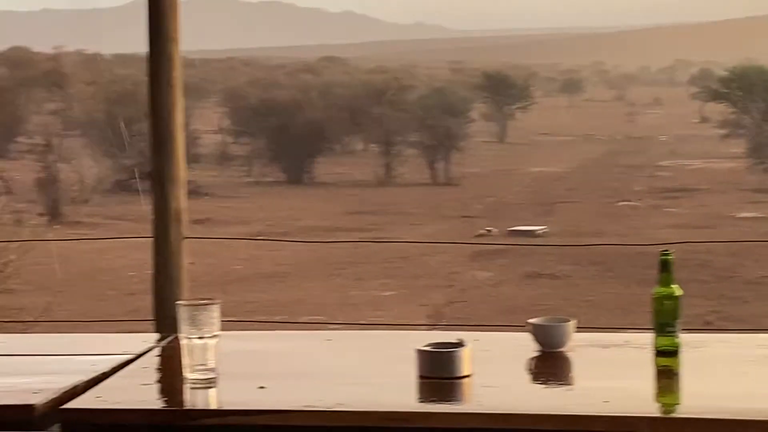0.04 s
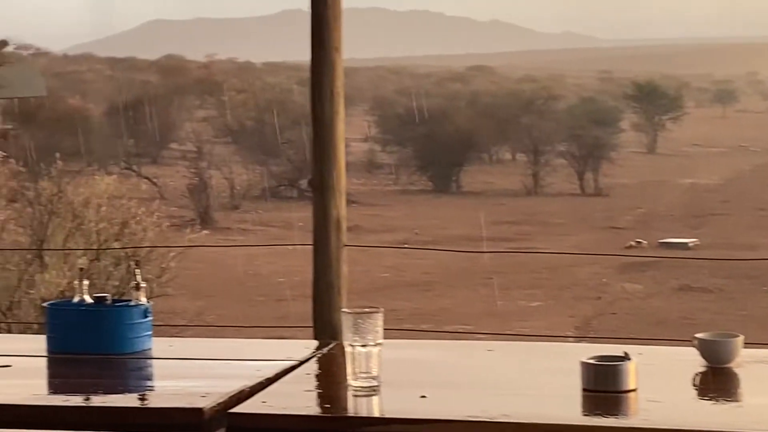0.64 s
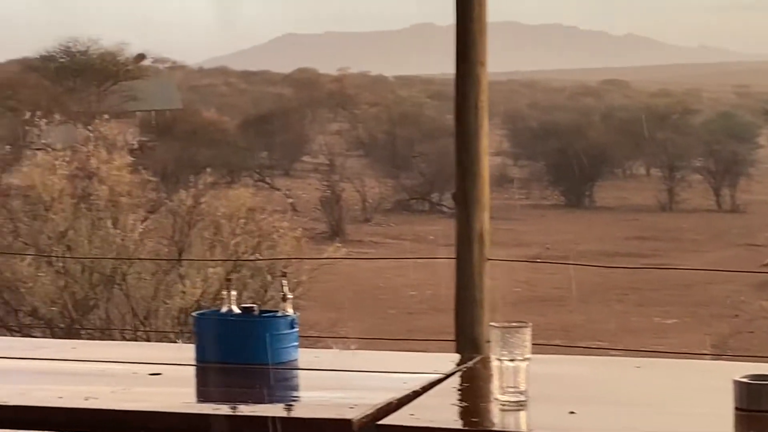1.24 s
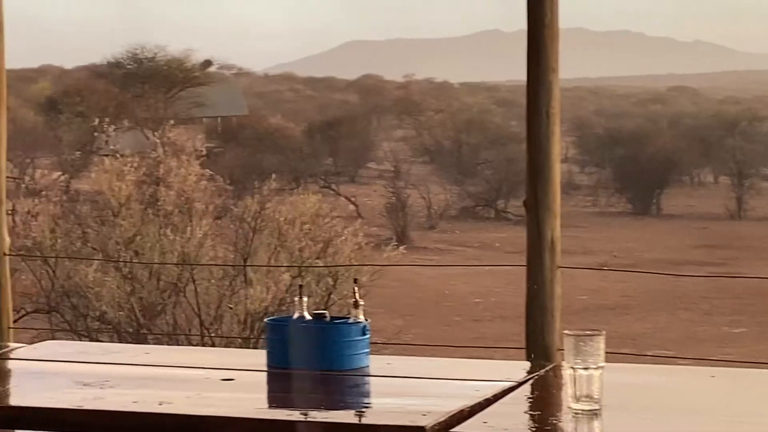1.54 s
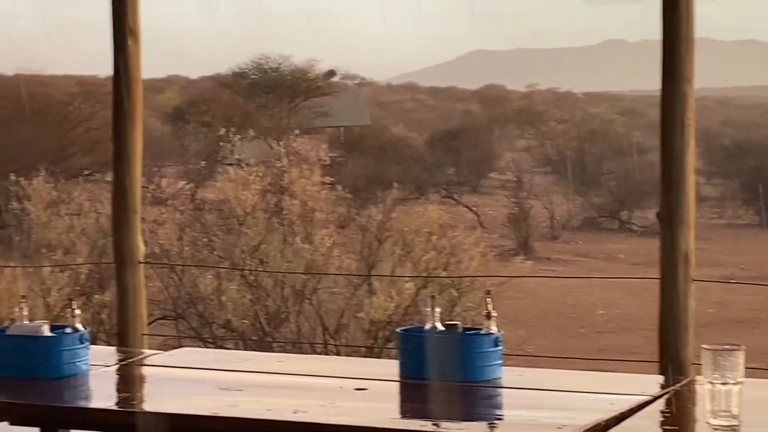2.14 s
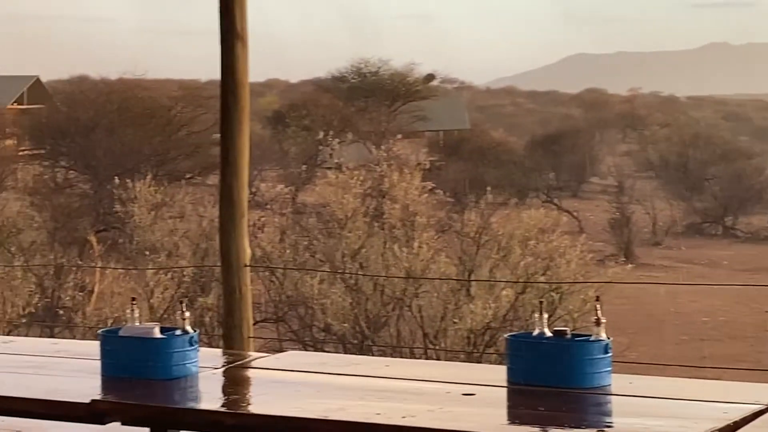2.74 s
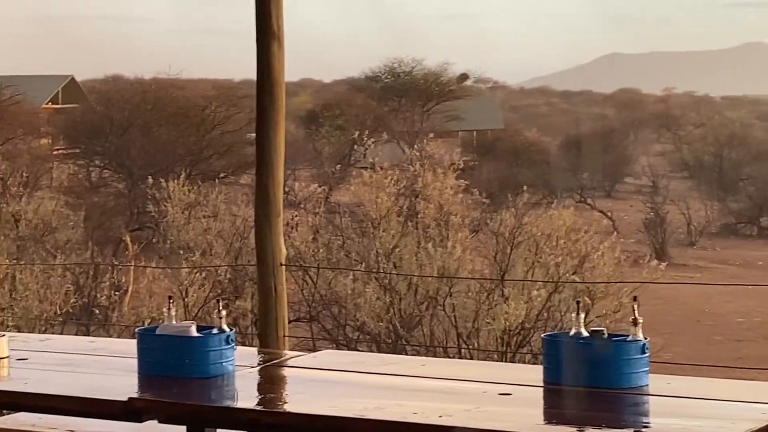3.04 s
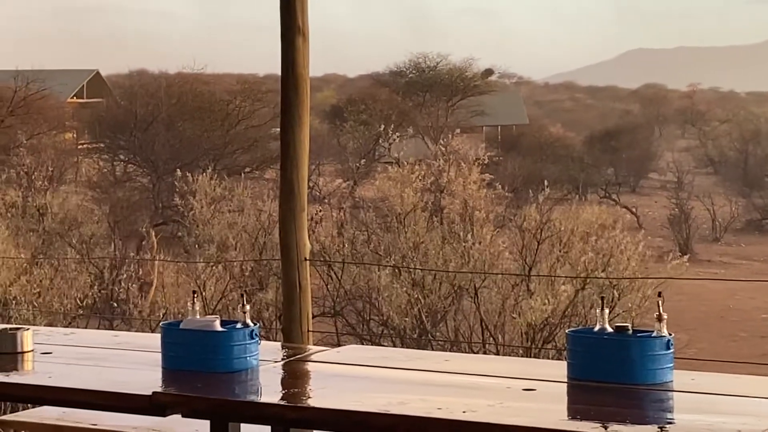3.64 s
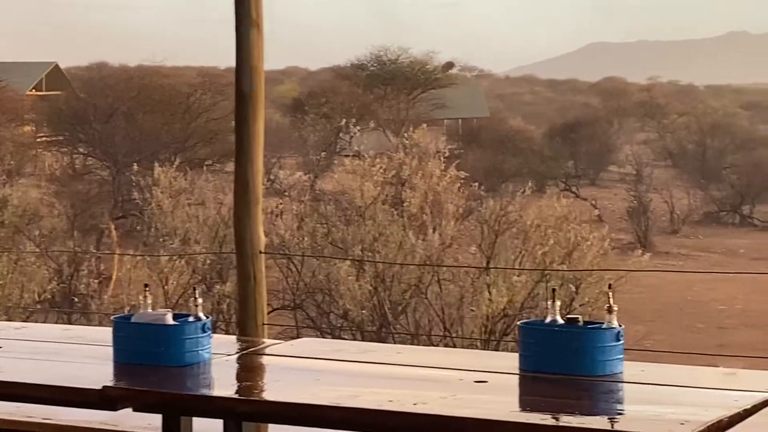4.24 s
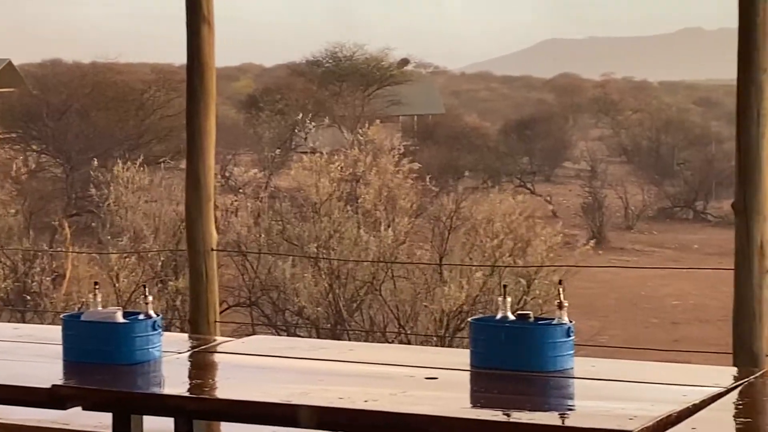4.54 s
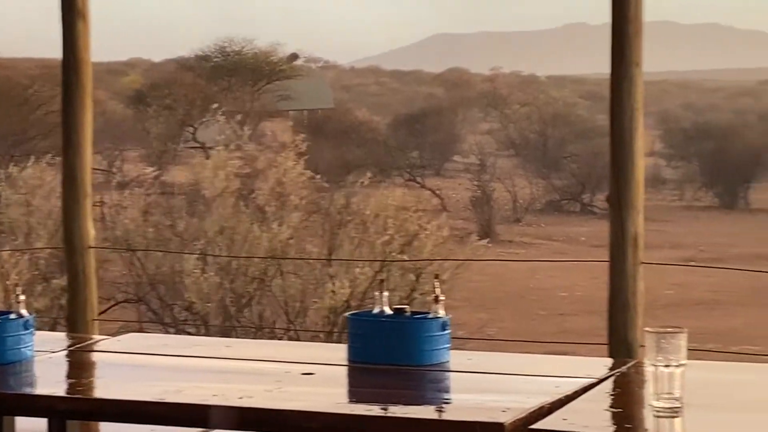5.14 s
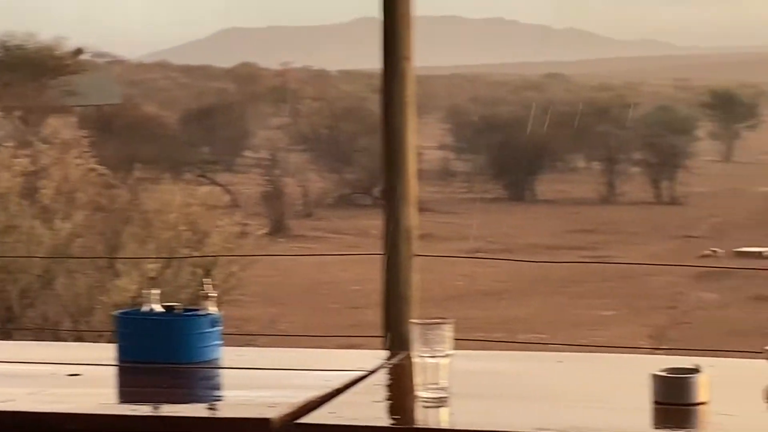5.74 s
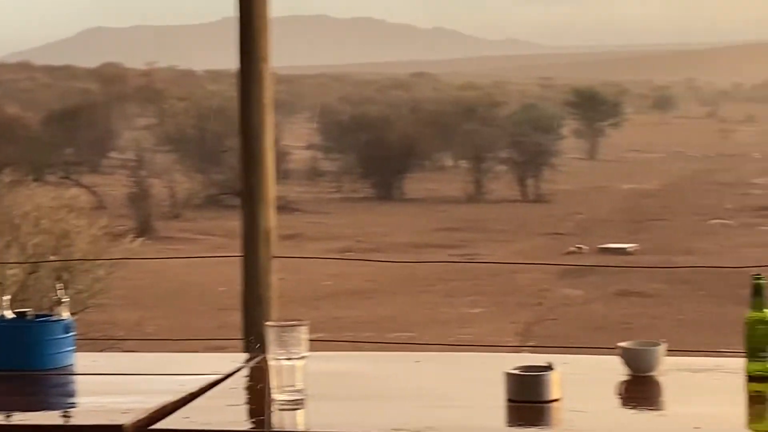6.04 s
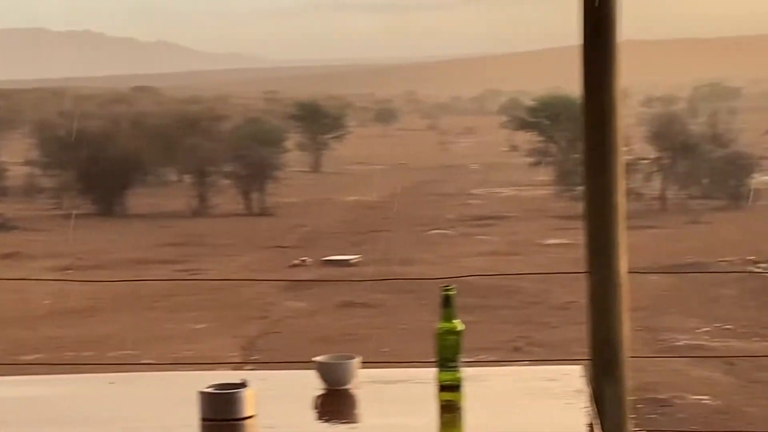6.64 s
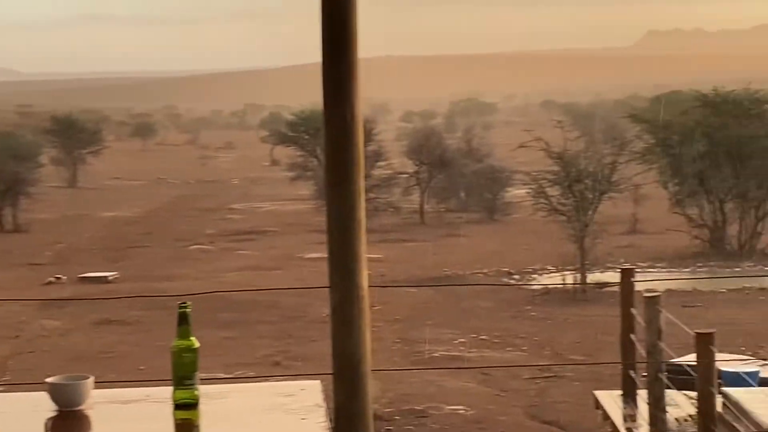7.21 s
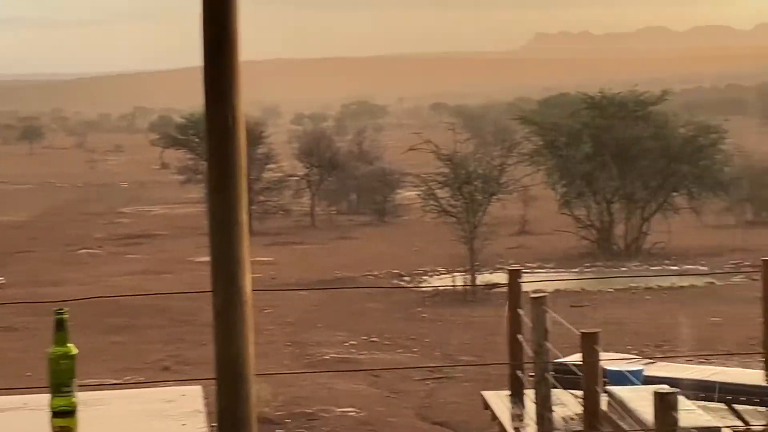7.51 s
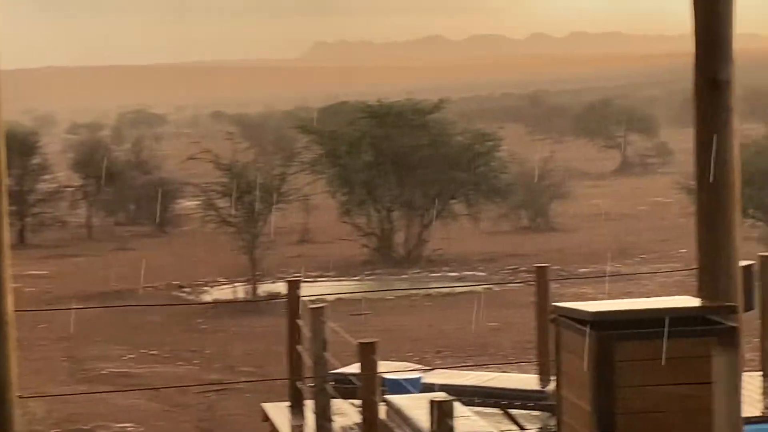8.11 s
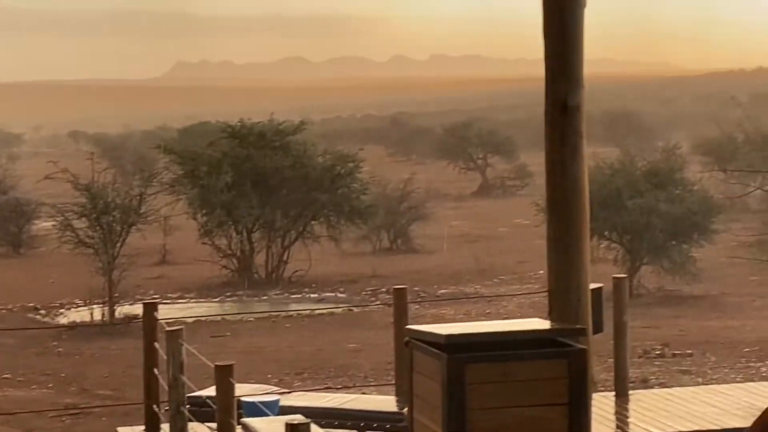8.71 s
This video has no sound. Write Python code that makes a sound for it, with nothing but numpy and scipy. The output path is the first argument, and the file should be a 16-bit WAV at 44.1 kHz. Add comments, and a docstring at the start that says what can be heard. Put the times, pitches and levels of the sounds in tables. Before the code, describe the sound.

Steady rain over open country and a roofed deck, with sharp drips smacking on wet tables and boards.

```python
"""A roofed wooden deck in open bush country, in steady rain.
Countless far drops add incoherently into a wash, while drops overhead drive the modes of the roof sheets.
Nearer impacts are heard singly: small drops patter, drips smack on wet tables and boards, and trickles
spatter, all scattered briefly by the deck. Late on, gusts rumble at the microphones,
and two soft bumps sound near the end."""
import sys
import numpy as np
from scipy import signal
from scipy.fft import rfft, irfft, next_fast_len
from scipy.io import wavfile
from scipy.ndimage import uniform_filter1d

SR = 44100
rng = np.random.default_rng(int(sys.argv[2]) if len(sys.argv) > 2 else 0)


def to_wav(s):
    """Save 16-bit WAV."""
    ch = np.atleast_2d(s).T  # columns
    pcm = np.round(np.clip(ch, -1, 1) * 32767)  # PCM
    wavfile.write(sys.argv[1], SR, pcm.astype(np.int16))


N = 386757

# strength of the nearer rain, taken about its mean: (time [s], level [dB])
RAIN_STRENGTH = [(0, -32.5), (1.25, -31), (2.0, -33), (2.5, -32), (2.9, -33.0), (3.75, -33), (4.05, -33),
                 (4.45, -33), (4.8, -33), (5.2, -35.0), (6.05, -35), (6.95, -34), (7.5, -32), (8.1, -33.5),
                 (8.77, -32.6)]
# roar of far rain on open ground, taken about its mean: (time [s], level [dB])
FAR_ROAR = [(0, -35.5), (0.8, -34.5), (1.3, -34.5), (1.85, -35), (2.5, -34), (2.75, -36), (3.1, -34.6),
            (3.45, -35.5), (4.05, -34.5), (4.35, -35.5), (4.8, -35), (5.2, -37), (6.1, -36.7), (6.55, -36),
            (6.95, -36), (7.5, -34), (7.95, -35.5), (8.4, -35.5), (8.77, -35)]
# spectrum of the wash: (frequency [Hz], relative spectral density [dB])
WASH_SPECTRUM = [(30, -14), (55, -3), (85, -6.5), (130, -6), (230, -3.5), (450, -1.5), (800, -1.5),
                 (1400, -4.5), (2400, -7.5), (4000, -14.5), (6000, -20.5), (8500, -25.5), (12000, -27.5),
                 (15500, -32.5)]
# stereo image of the wash: (frequency [Hz], left-right correlation [0-1], left minus right [dB])
WASH_IMAGE = [(60, 0.98, 0.5), (130, 0.92, -2), (250, 0.92, -1.5), (503, 0.66, -1.3), (800, 0.67, 0),
              (1320, 0.53, -2), (1650, 0.28, -1.5), (2460, 0.74, -1.3), (3320, 1, 0.6), (6460, 1, 0.5)]
# modes of the roof sheets: (frequency [Hz], bandwidth [Hz], relative level [dB])
ROOF_MODES = [(208.3, 17, -3), (300, 27, -1), (393, 35, -2.5), (592, 40, 0.5), (763, 56, -1.5)]
# heavy drops that set a sheet humming: (time [s], level [dB], frequency [Hz])
HEAVY_DROPS = [(0.11, -34.5, 382), (0.36, -36.5, 205), (0.52, -36, 428), (0.77, -36, 305),
               (1.61, -35.5, 214.4), (3.29, -35, 450), (8.27, -34.5, 296)]
# the loudest drips: (time [s], relative level over 1 ms [dB], pitch [Hz],
# slap re smack [dB], wet ring re smack [dB], crispness [0-1])
LOUD_DRIPS = [(0.2113, -38, 11000, -4, -5, 0.2), (0.3436, -24.5, 10400, 0, -9, 1),
              (0.4282, -41, 4800, -4, -7, 0), (0.551, -30.5, 7800, 8, -7, 0.9),
              (0.5835, -33, 11500, 9, -9, 1), (0.6232, -36, 12200, 0, -9, 0.7),
              (0.8536, -36, 8500, 6, -9, 0.6), (1.0479, -26.5, 4400, 7, -8, 0.6),
              (1.0971, -33, 3900, -4, -3, 0), (1.1157, -21, 12400, 8, -12, 1),
              (1.1749, -29, 8000, 12, -7, 0.6), (1.1868, -27, 6600, 0, -5, 0),
              (1.5751, -26, 7800, -3, -5, 0.5), (1.6856, -30.5, 4600, 6, -4, 1),
              (1.8987, -40, 12000, 2, -9, 0.61), (1.9121, -41, 11000, 0, -7, 0.5),
              (1.9557, -41, 11000, 0, -7, 0.5), (2.0424, -27.5, 8800, 7, -9, 0.6),
              (2.102, -27, 8200, 11, -12, 0.7), (2.1332, -31.5, 3900, 2, -5, 0.6),
              (2.2488, -31, 8360, 2, -9, 0.8), (2.2705, -37, 6700, -5, -7, 0.46),
              (2.2918, -32.5, 4600, -4, -5, 0), (2.3653, -35, 7600, 4, -7, 0.4),
              (2.3785, -39, 9500, 3, -7, 0.5), (2.3918, -37, 11500, -4, -7, 0.94),
              (2.5207, -39, 11000, 0, -7, 0.5), (2.5751, -37, 6500, -3, -5, 0),
              (2.6252, -34, 11500, -3, -7, 1), (2.6503, -36, 8800, -2, -7, 0.97),
              (2.6647, -40, 6600, -3, -5, 0), (2.7165, -43, 11000, 0, -7, 0.5),
              (2.8937, -36, 8300, -5, -7, 0.55), (2.9759, -37, 11000, 4, -7, 0.3),
              (2.9985, -34, 7000, 2, -7, 0.6), (3.0092, -31, 4300, -12, -5, 0),
              (3.014, -34, 5700, -10, -2, 0.3), (3.0175, -35, 5300, -10, -2, 0),
              (3.026, -26, 9300, 8, -5, 1), (3.0298, -30, 6500, 16, -5, 1),
              (3.0376, -36, 10500, -4, -7, 0.8), (3.3731, -37, 8500, 5, -7, 0.5),
              (3.4667, -35, 8300, 6, -7, 0.7), (3.6977, -43, 11000, 0, -7, 0.5),
              (3.7495, -42, 11000, 0, -7, 0.5), (3.9848, -35, 11100, -4, -5, 0.8),
              (4.1025, -38, 12000, -2, -9, 0.85), (4.1673, -37, 6500, -8, -4, 0),
              (4.1952, -27, 10900, -5, -5, 1), (4.2666, -16, 6700, 4, -11, 0),
              (4.2751, -29, 4300, -7, -7, 0), (4.3256, -34, 9050, -2, -7, 0.55),
              (4.4888, -37, 11900, -2, -9, 0.8), (4.4998, -33, 9600, 2, -7, 0.8),
              (4.629, -34, 7000, -5, -5, 0), (4.7055, -40, 11000, 0, -7, 0.5),
              (4.7555, -36, 10500, 6, -7, 0.6), (4.8878, -24.5, 7840, 3, -6, 0.7),
              (4.8985, -35, 11500, 3, -9, 1), (4.919, -41, 4500, 0, -7, 0),
              (4.9248, -36, 10000, 4, -7, 0.5), (5.0561, -41, 6500, -3, -5, 0),
              (5.3065, -33, 6200, -14, -3, 0), (5.4141, -35, 7800, -4, -7, 0.97),
              (5.6502, -35.5, 10000, 5, -7, 0.8), (5.6586, -37, 5200, 5, -7, 0.3),
              (5.8286, -41, 10900, -4, -7, 0.85), (5.9736, -39, 11000, -3, -7, 0.5),
              (6.3388, -40, 7600, 2, -7, 0.3), (6.4039, -46, 7600, 2, -7, 0.4),
              (6.4591, -39, 7600, 0, -7, 0.2), (6.5195, -24, 3030, -8, 8, 1),
              (6.7046, -24, 6850, -2, -3, 0.2), (6.7727, -33, 5000, 0, -5, 0.0078),
              (6.8971, -18.5, 4040, 5, -10, 0), (6.8974, -28, 10300, -6, -5, 0),
              (6.9157, -39, 11300, -3, -7, 0.5), (6.9978, -37, 11500, -3, -7, 0.88),
              (7.0237, -32, 5200, 0, 2, 0.9), (7.0801, -34.5, 5000, -3, -3, 0),
              (7.1677, -25.5, 6500, 3, -7, 0.2), (7.1725, -41, 11300, -3, -7, 0.5),
              (7.2016, -25, 3600, 10, 2, 0.4), (7.2608, -33.5, 11500, -5, -7, 0.9),
              (7.2687, -31, 4200, 0, -3, 0), (7.4427, -35, 11000, 2, -9, 1),
              (7.4567, -20.5, 6440, -1, -3, 0), (7.6157, -34, 7900, -5, -5, 0.3),
              (7.6529, -33, 5000, 5, -5, 1), (7.7752, -30, 7000, 16, -7, 1),
              (7.8058, -20.5, 4460, 0, -9, 0.7), (7.9278, -36, 7600, 9, -5, 0.3),
              (7.9662, -30.5, 9200, -3, -7, 1), (7.9827, -40, 11000, 0, -7, 0.5),
              (8.0294, -28, 6000, -4, -3, 0), (8.1259, -40, 11000, 0, -7, 0.5),
              (8.1405, -35, 5000, 8, -7, 0.3), (8.1873, -32, 3400, 1, -5, 0),
              (8.1965, -36, 8000, 4, -7, 0.5), (8.2155, -30.5, 7100, 6, -5, 0.3),
              (8.2296, -40, 11000, 0, -7, 0.5), (8.3806, -39, 10700, -4, -7, 0.93),
              (8.434, -37, 6500, -5, -5, 0), (8.5845, -32, 10000, 7, -9, 1), (8.7547, -37, 6500, -3, -5, 0)]
# flurries of drops on single sheets: (peak time [s], half length [s], level [dB], frequency [Hz])
FLURRIES = [(0.56, 0.11, -42.5, 500), (0.72, .08, -42.5, 300), (0.78, .1, -44, 877), (1.24, .08, -45, 720),
            (1.6, 0.097, -44.5, 544), (2.58, .07, -47, 540), (2.78, .07, -46, 800),
            (3.682, 0.064, -44, 540), (4.04, .1, -40, 793), (4.22, .04, -41.5, 800), (4.43, .07, -43, 560),
            (4.68, 0.085, -42, 736), (4.76, 0.092, -43.5, 315), (4.918, .05, -43, 760),
            (7.46, .1, -43.5, 470), (7.523, .14, -44, 1050), (8.282, 0.11, -47, 500),
            (8.72, 0.073, -45, 270)]
# trickles that break into droplets: (peak time [s], half length [s], relative level [dB])
TRICKLES = [(0.58, .09, -50), (1.1, .03, -49), (1.167, 0.06, -43), (2.37, .025, -50), (2.52, .025, -49),
            (3.025, .03, -43), (4.92, 0.03, -47), (7.473, 0.027, -45), (8.21, 0.043, -48), (8.75, .03, -49)]
# gusts on the microphones: (peak time [s], half length [s], level [dB], frequency [Hz])
WIND_GUSTS = [(5.51, .035, -44, 52), (5.68, .06, -43, 50), (5.93, 0.037, -44, 55), (6.643, 0.2, -53, 85),
              (7.42, 0.39, -47.5, 75), (7.76, 0.065, -40, 65), (7.91, 0.05, -37, 85),
              (8.25, 0.3, -45.5, 65), (8.548, .06, -40, 95), (8.64, 0.042, -34, 99), (8.77, .06, -46, 65)]
# soft bumps at the microphones: (time [s], level [dB], frequency [Hz], 60 dB decay time [s])
LOW_BUMPS = [(8.606, -26, 126, .1), (8.642, -19, 55, 0.14)]

CUTOFF_HZ = 16300
TIME = np.arange(N) / SR


def from_db(db):
    """Amplitude ratio of a level in decibels."""
    return 10 ** (np.asarray(db) / 20)


def unit_rms(x):
    """Normalisation to an rms of 1."""
    return x / np.sqrt(np.mean(x ** 2) + 1e-20)


def about_mean(curve):
    """Linear interpolation of a level curve, in dB about its mean."""
    level = np.interp(TIME, *np.transpose(curve))
    return level - np.mean(level)


def at_hz(spectrum, hz):
    """Interpolation of each column on a log-frequency axis."""
    freqs, *columns = np.transpose(spectrum)
    return [np.interp(np.log(hz), np.log(freqs), column) for column in columns]


def band(x, low_hz, high_hz, order=2):
    """Causal Butterworth band-pass."""
    high_hz = min(high_hz, .46 * SR)
    low_hz = min(low_hz, .9 * high_hz)
    return signal.sosfilt(signal.butter(order, [low_hz, high_hz], "band", fs=SR, output="sos"), x + 1e-18)


def resonator(x, hz, width_hz):
    """Damped oscillator: a unit impulse starts a decaying sine of height 1."""
    r, w = np.exp(-np.pi * width_hz / SR), 2 * np.pi * hz / SR
    return signal.lfilter([0, np.sin(w)], [1, -2 * r * np.cos(w), r * r], x + 1e-18)


def drift(rate_hz):
    """Low-passed noise: a slow fluctuation with an rms of 1."""
    step = 40
    pole = np.exp(-2 * np.pi * rate_hz * step / SR)
    slow = signal.lfilter([1], [1, -2 * pole, pole ** 2], rng.standard_normal(N // step + 2002))[2000:]
    return np.interp(np.arange(N) / step, np.arange(len(slow)), unit_rms(slow))


def impacts(per_s, spread_db):
    """Poisson process of impulses: many small, a few large."""
    sizes = from_db(spread_db * np.minimum(rng.exponential(1, N), 3))
    return (rng.random(N) < per_s / SR) * sizes * rng.choice([-1, 1], N)


def swell(peak_s, half_s):
    """Gaussian envelope, down to 1/e at half_s from its peak."""
    return np.exp(-((TIME - peak_s) / half_s) ** 2)


def rain_wash(roar_db, hiss_db, spray_db, drops_per_s, spread_db, grain_share, patchy_db, surge_db):
    """Incoherent addition: far drops merge into noise; nearer ones stand out as grain in the treble."""
    edges = np.r_[np.geomspace(28, 4000, 18), np.geomspace(5000, 16500, 7)]
    white, run_in = rng.standard_normal((2, 2, N)), SR // 8
    surge = surge_db * drift(2.0)
    strength = about_mean(RAIN_STRENGTH) + surge
    roar = roar_db + 1.27 * (about_mean(FAR_ROAR) + surge)
    hiss = hiss_db + 1.03 * strength
    spray = spray_db + .98 * strength
    # the bass comes from far away and hardly changes; higher bands follow the nearer rain
    zone_levels, zone_hz = (roar_db, roar, hiss, spray), (100, 750, 2100, 5500)
    out, drops = np.zeros((2, N)), impacts(drops_per_s, spread_db)
    for k, (low, high) in enumerate(zip(edges, edges[1:])):
        hz = np.sqrt(low * high)
        below = drops  # each drop sounds in two neighbouring bands
        drops = impacts(drops_per_s, spread_db) if hz > 800 else np.roll(drops, SR)
        grain = grain_share * np.interp(hz, [500, 5000], [.3, 1])
        smooth, side = white[k % 2]
        mid = np.sqrt(1 - grain) * smooth + np.sqrt(grain) * unit_rms(below + drops)
        padded = np.pad([mid, side], ((0, 0), (run_in, 0)), "wrap")
        mid, side = band(padded, low, high, order=3)[:, run_in:]
        correlation, pan_db = at_hz(WASH_IMAGE, hz)
        pair = np.sqrt(1 + correlation) * mid + np.sqrt(1 - correlation) * side * [[1], [-1]]
        weights = at_hz(np.c_[zone_hz, np.eye(4)], hz)  # crossfade between the zones
        level = sum(weight * db for weight, db in zip(weights, zone_levels))
        gain = from_db(level + at_hz(WASH_SPECTRUM, hz)[0] + patchy_db * drift(21))
        out += gain * pair * from_db([[pan_db / 2], [-pan_db / 2]])
    return out


def roof_drumming(level_db, fade_db_per_s, stereo_width):
    """Modal excitation: random drops keep the roof's low modes ringing, louder in heavier rain."""
    def sheet():
        return unit_rms(sum(from_db(db) * unit_rms(resonator(impacts(150, 3.6), hz, width_hz))
                            for hz, width_hz, db in ROOF_MODES))
    fade = fade_db_per_s * (TIME - N / SR / 2)
    level = level_db + 1.8 * about_mean(RAIN_STRENGTH) - fade
    return from_db(level) * (sheet() + stereo_width * sheet() * [[1], [-1]])


def patter(boards_db, tables_db):
    """Impact noise of small, near drops: dull ticks from the boards, bright ones from wet tables."""
    boards = sum(band(impacts(30, 3), hz / 1.3, hz * 1.3) for hz in (3600, 5000, 6500))
    tables = sum(band(impacts(45, 3), hz / 1.25, hz * 1.25) for hz in (8000, 9800, 11800))
    ticks = from_db(boards_db) * unit_rms(boards) + from_db(tables_db) * unit_rms(tables)
    return ticks * from_db(.6 * about_mean(RAIN_STRENGTH))


def deck_scatter(x, level_db, t60_s):
    """Diffuse reflection from roof, posts and furniture adds a short, bright tail."""
    t = np.arange(SR // 4) / SR
    shared, per_side = rng.standard_normal(len(t)), rng.standard_normal((2, len(t)))
    decay = from_db(-60 * t / t60_s) * (t > .002)
    tail = band(shared + .3 * per_side, 5000, 13500, order=1) * decay
    response = from_db(level_db) * unit_rms(tail) / np.sqrt(len(t))
    return x + signal.fftconvolve(x[None], response, axes=1)[:, :N]


def roof_booms(attack_s, t60_s):
    """Free vibration: after a heavy drop, one mode of a sheet swells quickly and decays."""
    onset, db, hz = np.transpose(HEAVY_DROPS)[:, :, None]
    age = np.maximum(TIME - onset, 0)
    envelope = 1000 ** (-age / t60_s) * (1 - np.exp(-age / attack_s))
    return np.sum(from_db(db) * envelope * np.sin(2 * np.pi * hz * age), axis=0)


def faint_drips(count, per_s, level_db, spread_db, low_hz, high_hz):
    """Poisson arrivals of fainter drips at random pitches, as rows like those of LOUD_DRIPS."""
    gap, size, pitch = rng.random((count, 3)).T
    times = np.cumsum(-np.log(1 - gap)) / per_s
    levels = level_db + spread_db * np.sqrt(3) * (2 * size - 1)
    pitches = low_hz * (high_hz / low_hz) ** pitch
    slap_db, ring_db, crispness = 2, -7, .35
    return [(s, db, hz, slap_db, ring_db, crispness)
            for s, db, hz in zip(times, levels, pitches) if s < TIME[-1]]


def drips(rows, gain_db, ring_q, knock_db, echo_db):
    """Impulse response of a wet surface: a smack, a broad crisp-edged slap and a ring, then one echo."""
    out, click = np.zeros(N + SR), signal.unit_impulse(512)
    crack = unit_rms(band(click, 10300, CUTOFF_HZ))
    knock = unit_rms(band(click, 3030, 3770))
    echo_delays_s = rng.uniform(.0062, .009, len(rows))  # the path via the deck depends on where it lands
    for (s, db, hz, slap_db, ring_db, crispness), delay in zip(rows, echo_delays_s):
        smack = unit_rms(band(click, hz / 1.29, hz * 1.216, order=3))
        edge = from_db(-30 + 26 * crispness) * crack
        slap = unit_rms(band(click, hz / 2.53, hz * 1.6, order=3)) + edge
        ring = unit_rms(band(click, hz * (1 - .5 / ring_q), hz * (1 + .5 / ring_q), order=1))
        drip = unit_rms(smack + from_db(slap_db) * slap + from_db(ring_db) * ring)
        if hz < 7400:  # low drips knock on the boards; the others land on the tables
            drip += from_db(knock_db) * knock
        drip *= from_db(db + gain_db) * np.sqrt(SR / 1000 / np.sum(drip ** 2))  # level over 1 ms
        for arrival, gain in ((s, 1), (s + delay, from_db(echo_db))):
            start = round(arrival * SR)
            out[start:start + len(drip)] += gain * drip
    return out[:N]


def roof_flurries(width_hz):
    """Forced vibration: a burst of drops drives one sheet, whose hollow resonance swells and fades."""
    out = np.zeros(N)
    for s, half_s, db, hz in FLURRIES:
        drumming = band(impacts(600, 1.6), hz - width_hz / 2, hz + width_hz / 2)
        out += from_db(db) * swell(s, half_s) * unit_rms(drumming)
    return out


def spatters(gain_db, low_hz, high_hz):
    """Shot noise: a trickle breaks up and lands as a brief cloud of tiny droplets."""
    cloud = sum(from_db(db) * swell(s, half_s) ** 2 for s, half_s, db in TRICKLES)
    droplets = band(impacts(1800, 2.5), low_hz, high_hz, order=1)
    return from_db(gain_db) * cloud * unit_rms(band(droplets, 2500, 13000))


def wind(breeze_db, breeze_hz, band_ratio):
    """Turbulent pressure: eddies rumble at the microphones, in gusts over a faint breeze."""
    def rumble(hz):
        eddies = band(rng.standard_normal(N), hz / band_ratio, hz * band_ratio)
        return eddies / np.sqrt(uniform_filter1d(eddies ** 2, size=4000) + 1e-12)
    gusts = sum(from_db(db) * swell(s, half_s) * rumble(hz) for s, half_s, db, hz in WIND_GUSTS)
    return from_db(breeze_db) * rumble(breeze_hz) + gusts


def bumps():
    """Damped oscillation: dull thuds at the microphones die in a few cycles."""
    out = np.zeros(N)
    for s, db, hz, t60_s in LOW_BUMPS:
        impulse = signal.unit_impulse(N, round(s * SR))
        out += from_db(db) * resonator(impulse, hz, width_hz=np.log(1000) / np.pi / t60_s)
    return band(out, 20, 250)


def treble_stereo_shift(x, in_step_hz, lag_s):
    """Phase shift: above in_step_hz the left channel lags the right, widening the treble."""
    size = next_fast_len(N + SR // 10)
    excess_hz = np.maximum(np.arange(size // 2 + 1) * SR / size - in_step_hz, 0)
    left = irfft(rfft(x[0], size) * np.exp(-2j * np.pi * excess_hz * lag_s), size)[:N]
    return np.array([left, x[1]])


def scene():
    """Superposition of the wash all round, the roof above, near drops on the deck, wind and bumps."""
    wash = rain_wash(roar_db=-24, hiss_db=-24, spray_db=-25, drops_per_s=500, spread_db=4,
                     grain_share=.4, patchy_db=.93, surge_db=.2)
    roof = roof_drumming(level_db=-48, fade_db_per_s=.2, stereo_width=.39)
    roof += roof_booms(attack_s=.01, t60_s=.48) + roof_flurries(width_hz=93)
    near = patter(boards_db=-62.5, tables_db=-59)
    faint = faint_drips(count=60, per_s=4, level_db=-41.5, spread_db=1, low_hz=4800, high_hz=11000)
    near += drips(LOUD_DRIPS + faint, gain_db=1.1, ring_q=8, knock_db=-14, echo_db=-15)
    near += spatters(gain_db=2, low_hz=3000, high_hz=7140)
    deck = deck_scatter(near, level_db=-11.5, t60_s=.17)
    buffeting = wind(breeze_db=-62, breeze_hz=75, band_ratio=1.5) + bumps()
    return treble_stereo_shift(wash + roof + deck + buffeting, in_step_hz=7004, lag_s=.00024)


def record(dry):
    """Band limiting: the deepest bass and the very top are cut."""
    high_passed = signal.sosfilt(signal.butter(4, 33, "high", fs=SR, output="sos"), dry)
    return signal.sosfilt(signal.ellip(10, .1, 80, CUTOFF_HZ, fs=SR, output="sos"), high_passed)


dry = scene()
out = record(dry)
to_wav(out)
```